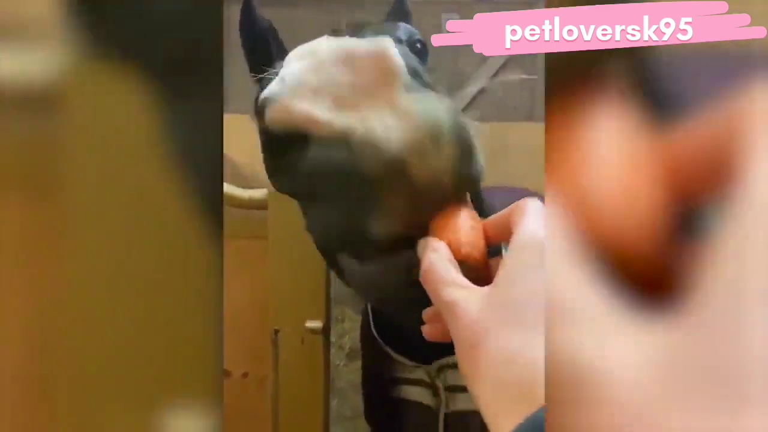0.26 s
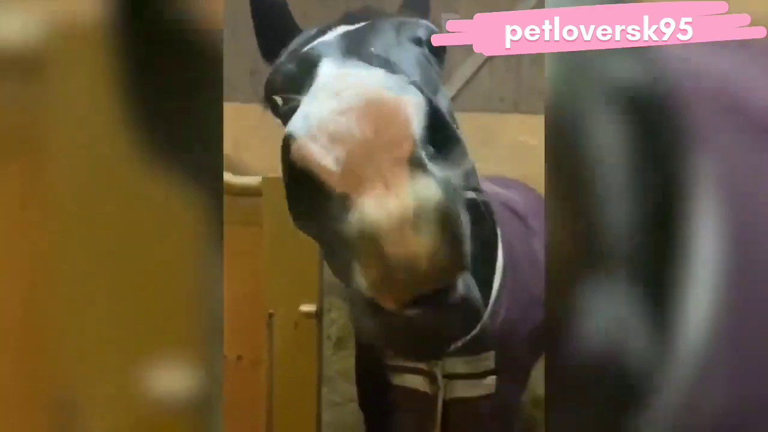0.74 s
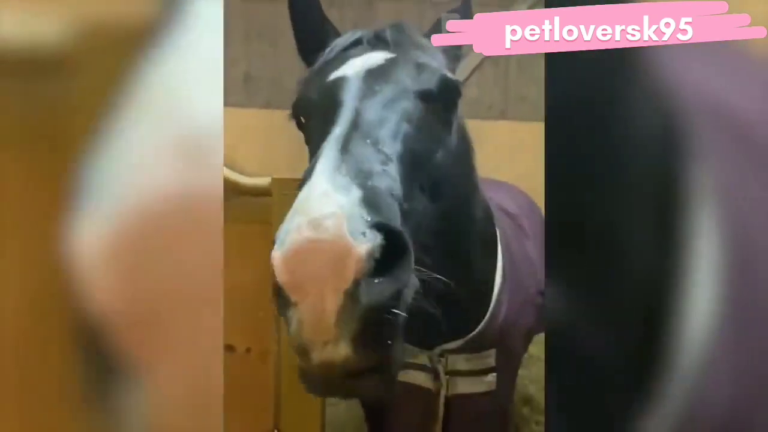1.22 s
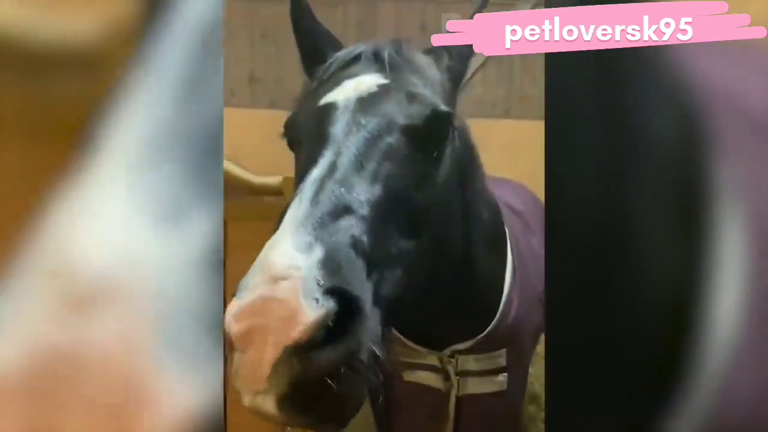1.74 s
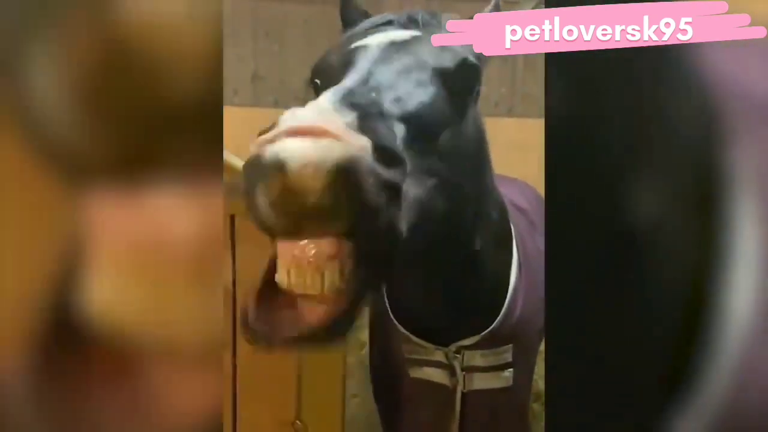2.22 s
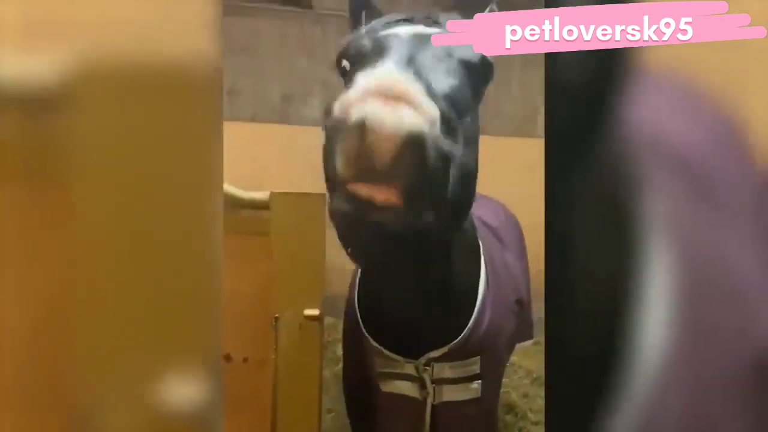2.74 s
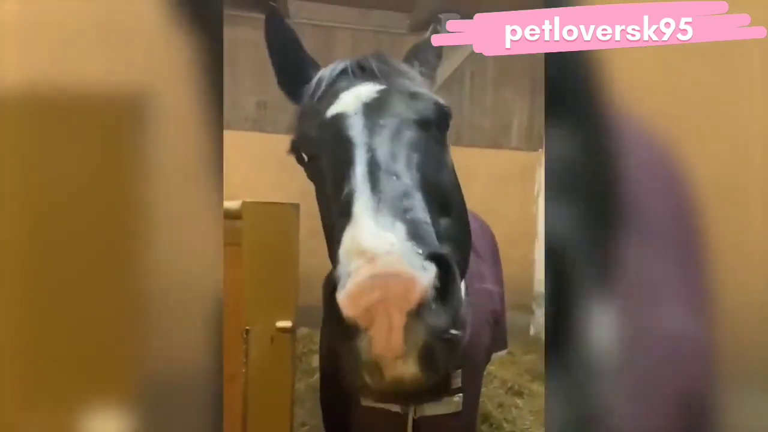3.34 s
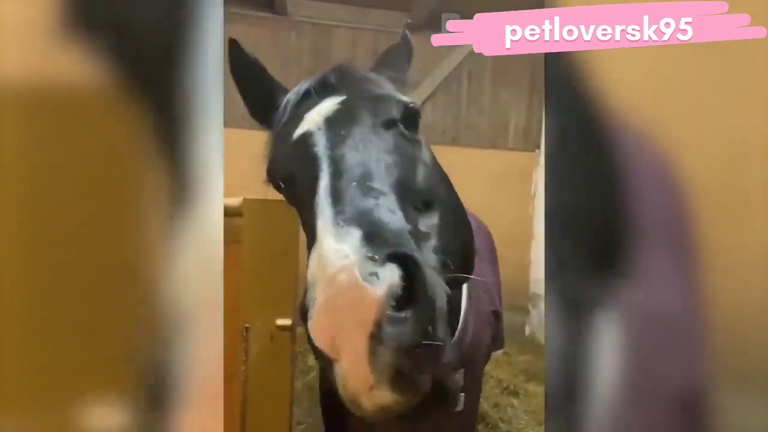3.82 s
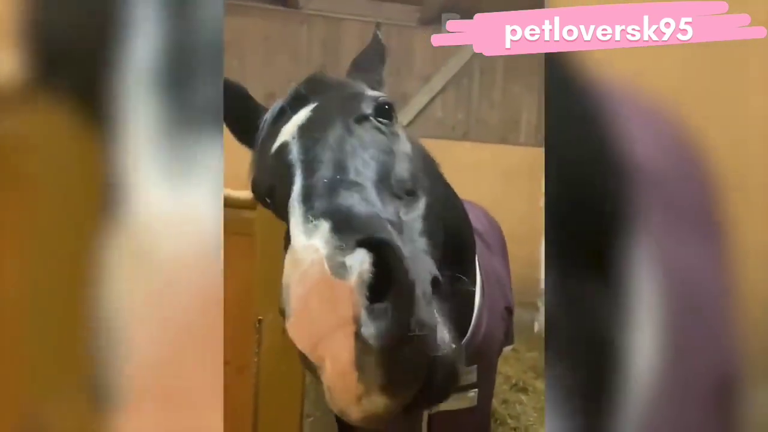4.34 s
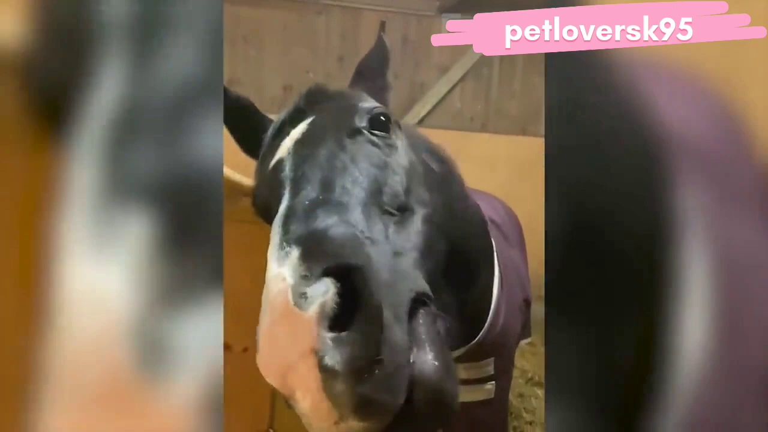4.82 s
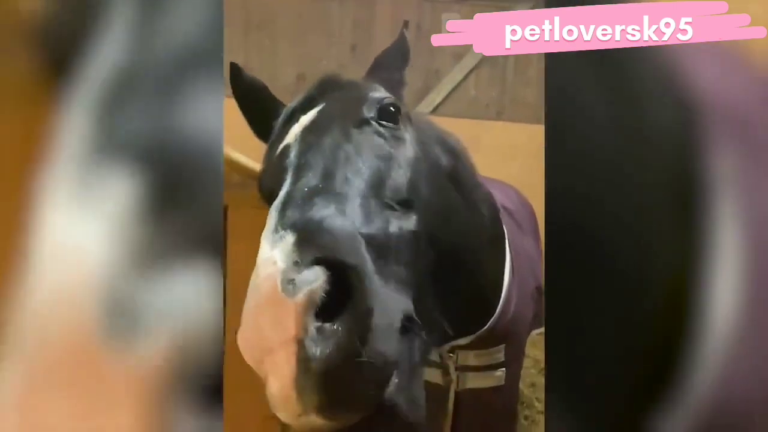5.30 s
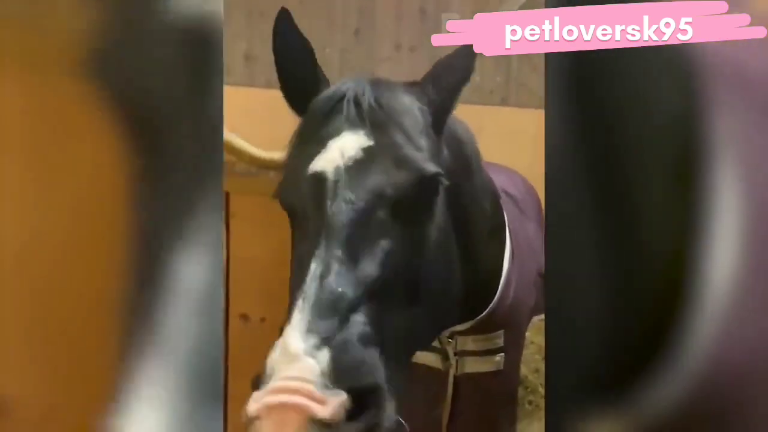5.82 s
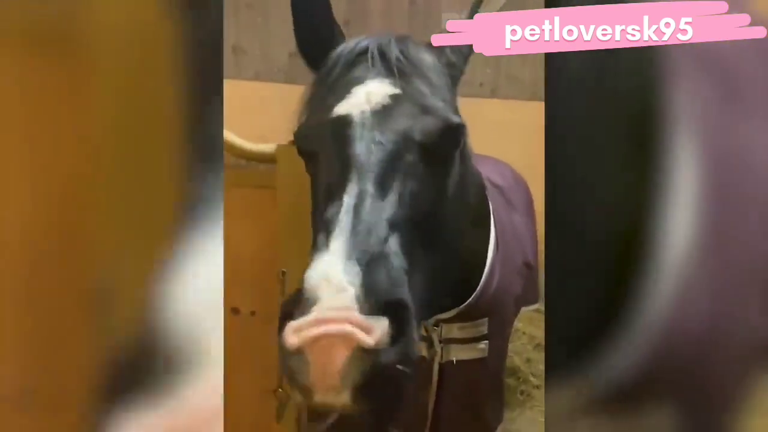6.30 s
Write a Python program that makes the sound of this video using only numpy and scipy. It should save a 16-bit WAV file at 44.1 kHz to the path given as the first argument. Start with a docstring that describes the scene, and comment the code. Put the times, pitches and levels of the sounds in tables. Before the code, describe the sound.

A horse eats a carrot very close to a phone in a wooden stall with a short diffuse echo and faint low rumble. At 0 s lips rub the carrot over a low grinding, with dull tooth knocks and small wet cracks; a crisper click comes at 0.5 s and another at 1.0 s. Light mouthing continues until 1.74-1.82 s, when the carrot breaks in a loud, hollow, splintering crunch. Wet lip smacks follow at about 2.2, 2.4, 2.6 and 2.8 s, the last three the loudest: sharp, popping, spitty. After a brief lull, chewing resumes from 3.0 s: moist crackle, fibre snaps and squelches, with heavier bites near 3.87, 4.2 and 4.46 s. Juicy crunches continue irregularly through 5.0, 5.35 and 5.6-5.8 s. A softer smack at 6.03 s leads to two wet smacks with hollow jaw knocks at 6.22 and 6.43 s.

```python
"""A horse bites through a carrot close to a phone in a wooden stall, smacks its lips and chews.
Breaks and tooth contacts ring the head's hollows as decaying sines; wet films snap in small cavities
that slide in pitch; jaw strokes grind the pulp as resonated random grains; crackle and fizz burst
around the lip smacks. The stall adds a short diffuse echo and a faint noise background."""
import sys
import numpy as np
from scipy import signal
from scipy.fft import rfft, irfft, next_fast_len
from scipy.io import wavfile
from scipy.ndimage import uniform_filter1d

SR = 44100
rng = np.random.default_rng(int(sys.argv[2]) if len(sys.argv) > 2 else 0)


def to_wav(sig):
    """Store sig (one row per channel, or 1-D mono) as 16-bit WAV at the path in sys.argv[1].

    Samples outside -1..1 are clipped; the rate is SR.
    """
    pcm = np.clip(np.atleast_2d(sig), -1, 1) * 32767
    pcm = np.round(pcm).astype(np.int16)
    wavfile.write(sys.argv[1], SR, pcm.T)  # frames by channels


N = 289709
TIME = np.arange(N) / SR
CONTROL_TIME = TIME[::32]
TOP_HZ = 16000

# Levels and gains in tables are relative: filters and layer gains follow.
# stall background: [f/Hz, relative density/dB per Hz]
STALL = [(20, -23), (40, -0.5), (62, 8.5), (110, -2), (260, -1), (500, -34), (1000, -27), (2500, -19.5),
         (6000, -42.5), (16000, -39)]
STALL_DB = -55.5
# lips dragging over the carrot's skin: [t/s, length/s, level/dB, f/Hz, section width/Hz]
RUBS = [(0.0, 0.12, -50.5, 2220, 1030), (0.0, 0.085, -52, 480, 298), (0.774, 0.3, -59, 1120, 437),
        (0.879, 0.078, -55.5, 2120, 1200)]
# jaw strokes: [peak t/s, build-up/s, release/s, grinding level/dB, pulp crackle level/dB]
STROKES = [(0.01, 0.41, 0.22, -31.5, -56.5), (0.24, 0.31, 0.083, -52, -61), (0.64, 0.02, 0.12, -74, -60),
           (0.778, 0.12, 0.48, -45.5, -61), (1.04, 0.24, 0.25, -54, -54.5), (1.25, 0.24, 0.24, -55.5, -61),
           (1.45, 0.061, 0.27, -60, -57), (1.55, 0.058, 0.069, -62, -49), (1.65, 0.12, 0.03, -42.5, -48.5),
           (1.77, 0.1, 0.26, -29.5, -39.5), (2.09, 0.056, 0.092, -42, -50.5),
           (3.051, 0.18, 0.24, -54, -51.5), (3.279, 0.13, 0.18, -44, -51.5), (3.4, 0.2, 0.26, -46, -51.5),
           (3.645, 0.11, 0.13, -44.5, -46), (3.87, 0.33, 0.4, -40.5, -45.5), (4.05, 0.034, 0.095, -46, -47),
           (4.21, 0.18, 0.22, -45.5, -46.5), (4.39, 0.17, 0.29, -45.5, -46.5),
           (4.457, 0.081, 0.11, -32.5, -41), (4.774, 0.086, 0.053, -45.5, -36.5),
           (4.87, 0.07, 0.27, -51, -55), (5.018, 0.17, 0.27, -38.5, -41), (5.189, 0.079, 0.17, -45, -61),
           (5.367, 0.085, 0.13, -38.5, -40), (5.575, 0.18, 0.11, -42, -48.5), (5.647, 0.22, 0.13, -37, -41),
           (5.819, 0.1, 0.021, -49, -59), (6.04, 0.023, 0.35, -45.5, -55), (6.25, 0.096, 0.11, -47, -76),
           (6.449, 0.099, 0.21, -40, -53)]
STROKE_RANGE_DB = 31.5  # climb over one build-up, fall over one release
REST_GRIND_DB, REST_CRACKLE_DB = -65, -85.5  # the tongue works on between strokes
JUICE_FIZZ_DB = -13.5  # pressed-out juice, re crackle
# bursts of crackle and fizz around the lip smacks: [t/s, crackle level/dB, fizz level/dB]
WET_BURSTS = [(2.186, -49, -43.5), (2.196, -49, -37), (2.392, -26.5, -25.5), (2.579, -29, -30),
              (2.782, -31, -25), (6.018, -46.5, -40), (6.028, -42.5, -31), (6.222, -34.5, -34.5),
              (6.409, -44, -39.5)]
BURST_RISE_S, BURST_FALL_S = 0.033, 0.032  # per STROKE_RANGE_DB
BURST_RUB_DB = -5  # dull part of a burst, re crackle
TRICKLE_DB, TRICKLE_S = -22, 0.17  # saliva crackles on after a burst
# faint fizz of saliva in the mouth: [t/s, level/dB]
SALIVA = [(0.0, -74.5), (0.36, -63.5), (0.55, -60), (0.71, -61.5), (0.78, -55.5), (1.11, -59), (1.2, -58),
          (1.37, -62), (1.76, -54), (1.9, -66), (2.12, -99), (2.38, -65.5), (2.67, -61), (3.4, -66.5),
          (4.06, -61), (4.48, -68), (4.92, -59.5), (5.58, -72.5), (5.85, -82.5), (6.57, -61.5)]
SALIVA_SWELL_DB, SALIVA_SWELLS_PER_S = 2.5, 9
# grinding heard through the cheeks: [f/Hz, section width/Hz, gain/dB]
CHEEKS = [(100, 440, -2.5), (181, 285, 4), (298, 100, -1), (452, 100, -11.5), (744, 145, 0.5)]
# resonances of the mouth around the pulp: [f/Hz, section width/Hz, gain/dB]
MOUTH = [(700, 250, 9.5), (1555, 540, 11.5), (2027, 68, 15), (2790, 890, 9), (4280, 490, 3), (5730, 140, 4)]
# colour of the saliva's fizz: [f/Hz, relative gain/dB]
FIZZ = [(2500, -1), (5000, 4), (6200, 2), (7500, -5), (9200, 1), (12300, -1.5), (13800, -21), (16000, -11)]
# stray films of saliva
TICKS_PER_S, TICK_DB, TICK_SPREAD_DB = 18, 8, 3
TICK_CEILING_DB = -52  # cap on the stroke level that drives them
# paths through the changing gap of the lips: [median delay/s, gain/1]
LIP_PATHS = [(.00055, -.55), (.0013, .45)]
LIP_MOVES_PER_S, LIP_TRAVEL = 9, .22  # travel: rms of log delay
# stall echo: [band centre f/Hz, t60/s, relative gain/dB]
ECHO = [(151, 0.74, -15), (347, 0.38, -11), (1154, 0.54, -11.5), (3380, 0.2, -10.5), (9130, 0.19, -11.5)]
# jaw knocks, the carrot breaking at the loudest:
# [t/s, level/dB, head f/Hz, head t60/s, relative mouth level/dB, mouth f/Hz]
KNOCKS = [(0.0375, -28, 225, 0.0029, -18, 750), (0.352, -41, 322, 0.012, -19, 870),
          (0.442, -30, 304, 0.08, -34, 810), (0.6292, -29.5, 246, 0.032, -56, 560),
          (0.646, -38.5, 216, 0.13, -58, 550), (0.662, -30, 201, 0.024, -41, 885),
          (0.769, -36.5, 116, 0.058, -22, 804), (0.805, -41, 108, 0.16, -25, 950),
          (0.883, -40.5, 108, 0.13, -11, 930), (1.001, -44.5, 364, 0.024, -7, 790),
          (1.188, -40, 240, 0.043, -32, 770), (1.229, -32, 205, 0.0062, -39, 863),
          (1.2516, -34.5, 202, 0.029, -44, 755), (1.4338, -38, 270, 0.041, -31, 720),
          (1.545, -46, 337, 0.19, 8.5, 826), (1.649, -40, 314, 0.12, 8, 836),
          (1.7371, -15.5, 320, 0.17, -3, 773), (1.7614, -13, 320, 0.12, -6, 765),
          (1.7802, -17, 320, 0.054, -7, 833), (1.8175, -15, 334.4, 0.11, -14.5, 708),
          (1.8463, -34.5, 330, 0.048, -24, 860), (1.884, -36, 312, 0.037, -30, 688),
          (2.0571, -32.5, 260, 0.053, -13.5, 668), (2.086, -36.5, 217, 0.14, -16, 770),
          (2.541, -46.5, 260, .03, -17, 740), (3.02, -39.5, 240, 0.035, -32, 740),
          (3.215, -44, 347, 0.056, -6.5, 710), (3.291, -33.5, 279, 0.056, -22, 720),
          (3.355, -38.5, 252, .04, -26, 730), (3.3935, -47, 267.6, 0.11, 12.5, 740),
          (3.621, -37.5, 312, 0.047, -27, 795), (3.666, -39, 326, 0.025, -11, 780),
          (3.703, -54.5, 296, .04, 5, 785), (3.81, -35, 306, 0.2, -33, 586),
          (3.853, -25.5, 274, 0.13, -15, 777), (3.879, -21, 234, 0.032, -13.5, 595),
          (4.0495, -42, 245, 0.15, -8, 850), (4.094, -41, 210, .035, -26, 750),
          (4.183, -36, 275, 0.054, -43, 670), (4.2012, -30, 283, 0.011, -41, 650),
          (4.236, -32, 302, 0.0096, -16, 820), (4.381, -37.5, 329, 0.1, 0, 810),
          (4.425, -41, 400, 0.017, -2, 800), (4.4585, -16, 247, 0.031, -15, 794),
          (4.485, -35, 126, 0.052, -33, 800), (4.644, -40.5, 220, .035, -19, 746),
          (4.68, -51, 310, 0.034, -1.5, 800), (4.751, -36.5, 353, 0.13, 1, 876),
          (4.777, -27.5, 370, 0.14, 2, 749), (4.856, -31.5, 343, 0.11, -15, 656),
          (4.92, -43, 336, 0.079, -10, 760), (4.9898, -28, 234, 0.17, -14, 587),
          (5.0154, -29.5, 265, 0.18, -23, 665), (5.0367, -32.5, 240, 0.11, -12, 733),
          (5.18, -32, 263, 0.071, -2, 794), (5.285, -52.5, 304, .03, 2.5, 855),
          (5.342, -35, 233, 0.069, -27, 890), (5.351, -41, 326, 0.034, -1, 800),
          (5.3606, -25, 281, 0.044, -15, 720), (5.5537, -37, 306, 0.15, -13, 645),
          (5.6247, -34.5, 285, 0.12, -7, 965), (5.6567, -34, 253, 0.033, -3, 905),
          (5.7292, -40, 456, 0.014, -10, 884), (5.797, -51, 330, 0.023, 1.5, 697),
          (6.029, -34.5, 332, 0.016, -17, 865), (6.04, -26.5, 252, 0.017, -12.5, 614),
          (6.2264, -18, 308, 0.027, -20, 677), (6.4282, -15, 345, 0.038, -13, 688),
          (6.4856, -36, 405, 0.044, -19, 564)]
# carrot fibres and saliva cracking between the teeth:
# [t/s, level/dB, cavity f/Hz, ring t60/s, relative spray level/dB]
CRACKS = [(0.2202, -33, 2320, 0.01, -24), (0.2599, -36, 2200, 0.0078, -15), (0.3872, -50, 1540, 0.0043, 3),
          (0.5153, -26, 4240, 0.0089, -13.5), (0.6157, -46.5, 3080, 0.0066, 6),
          (0.75, -32, 2960, 0.0051, -10.5), (1.0036, -20.5, 1810, 0.006, -18),
          (1.053, -32, 2710, 0.0074, -16), (1.068, -34, 2480, 0.013, -16),
          (1.1293, -31.5, 3040, 0.0099, -19), (1.6479, -33.5, 4460, 0.034, -3.5),
          (1.7371, -13.5, 3170, 0.0038, -17.5), (1.7618, -18.5, 1474, 0.021, -8),
          (1.7825, -18.5, 1500, 0.016, -20), (1.8202, -25.5, 2960, 0.006, -6),
          (2.057, -27, 1620, 0.0059, -36), (2.0935, -35, 2400, 0.015, -32),
          (2.1155, -37, 2420, 0.0066, -30), (2.8963, -44, 2280, 0.0072, -17),
          (3.042, -30.5, 1470, 0.012, -35), (3.17, -42.5, 3040, 0.021, -28),
          (3.214, -37, 2980, 0.0075, -13), (3.2546, -29, 2720, 0.012, -16), (3.279, -44.5, 3130, .01, 1),
          (3.36, -39, 2510, .009, -34), (3.3815, -39, 3070, 0.022, -35), (3.3924, -26.5, 2750, 0.019, -39),
          (3.417, -35, 2600, 0.013, -35), (3.4395, -44, 2650, 0.014, -25), (3.472, -38, 2750, 0.022, -14),
          (3.619, -27.5, 2680, 0.015, -19), (3.6468, -21.5, 1670, 0.024, -20),
          (3.6613, -30, 1500, 0.041, -33), (3.667, -44, 2900, .008, -12), (3.7046, -36, 2900, 0.033, -32),
          (3.8657, -29, 1550, 0.027, -9), (3.876, -36, 2820, 0.014, 4), (4.052, -24.5, 2510, 0.023, -10),
          (4.112, -36.5, 3040, 0.051, -6), (4.1826, -11.5, 2880, 0.0035, -26.5),
          (4.1998, -24, 1620, 0.018, -16.5), (4.2327, -33, 3580, 0.037, -11),
          (4.356, -41, 1230, 0.022, -4.5), (4.4523, -16, 1595, 0.014, -23.5),
          (4.582, -28, 2650, 0.004, -32), (4.614, -39.5, 3530, 0.0097, -5.5),
          (4.6854, -35, 2540, 0.0021, -8), (4.7618, -27, 3200, 0.0072, -24),
          (4.7797, -30, 3440, 0.0011, -25), (4.987, -28, 2420, 0.015, -34), (5.0027, -29, 3080, 0.023, -20),
          (5.0301, -23.5, 3330, 0.015, -14), (5.0314, -22, 2080, 0.0089, -21),
          (5.0575, -33.5, 1990, .009, -17), (5.1806, -25, 2780, 0.018, -9.5),
          (5.288, -34, 3620, 0.019, -11.5), (5.348, -29.5, 1320, 0.047, -13),
          (5.3612, -25.5, 3230, 0.006, -24), (5.5105, -40, 2090, .008, -28),
          (5.5753, -26, 2800, 0.0052, -35), (5.5845, -33, 2680, 0.0074, -27),
          (5.6205, -23, 2340, 0.006, -34), (5.646, -19, 2680, 0.0097, -33),
          (5.649, -18.5, 2900, 0.0045, -20), (5.7976, -43, 2320, 0.021, -11),
          (5.8141, -32, 2530, 0.011, -31), (5.8183, -16, 2700, 0.01, -34), (5.821, -37, 2300, .008, -18),
          (5.824, -51, 3130, 0.022, -19)]
CRACK_SWELL_S, CRACK_DROP_OCTAVES = .0009, .15
# lips and tongue snapping open:
# [t/s, level/dB, cavity f/Hz, ring t60/s, relative spray level/dB, swell/s, pitch drop/octaves]
SMACKS = [(2.1933, -29.5, 2860, .004, 15, 0.0017, -0.35), (2.1953, -17.5, 5930, .006, -21, 0.0018, -0.066),
          (2.2053, -19, 1670, .012, -23, 0.00059, 0.62), (2.2095, -17.5, 1620, .016, -23, 0.0011, 0.13),
          (2.227, -30, 2060, .009, -4, 0.00094, 0), (2.3374, -33.5, 2110, .008, -5, 0.00028, 0.28),
          (2.3614, -34.5, 3550, .0046, -2.5, 0.00075, -0.12),
          (2.3664, -31.5, 1440, .008, -8, 0.00088, 0.33), (2.3817, -6.5, 1305, .012, -5.5, .0014, 2),
          (2.394, -3.5, 2880, .005, -15.5, 0.00069, -0.31), (2.3948, -13.5, 4060, .008, -9, 0.0025, 0.71),
          (2.5648, -11, 2000, .005, -14.5, 0.00061, 0.3), (2.5804, -3, 1237, .011, -14, 0.0013, 1.4),
          (2.5902, -3, 2980, .012, -5, 0.00093, 0.065), (2.596, -17.5, 2410, .008, -30, 0.0014, -0.54),
          (2.6212, -24.5, 2060, .006, -15, 0.00062, 0), (2.6276, -28, 2100, .016, -28.5, 0.0009, 0.18),
          (2.7626, -25.5, 1480, .0094, -4.5, 0.0012, -0.73), (2.768, -30, 2190, .007, -15, 0.0009, -0.016),
          (2.783, -11, 1240, .011, -8, 0.0014, 1.23), (2.7936, 1, 2460, .013, -5.5, 0.00051, -0.15),
          (6.028, -14, 1380, .008, -2, 0.0018, 0.1), (6.2198, -26.5, 1620, .0026, 7, 0.00056, 1.6),
          (6.2246, -19, 3040, .0088, -15, 0.001, -0.069), (6.3984, -31, 3420, .0087, -3, 0.0011, -0.24),
          (6.407, -25, 2880, .0056, -21, 0.00064, 0.1), (6.4228, -17.5, 1450, .016, 1.5, 0.00077, -0.19),
          (6.4288, -15.5, 1490, .0092, -5, 0.0013, 0.34)]
# partials of a snapping cavity: [nominal frequency ratio/1, level/dB]
CAVITY = [(1.001, -1.5), (1.52, -50), (2.38, -31), (3.7, -37.5)]
# colour of the spray from a snap: [f/Hz, relative gain/dB]
SPRAY = [(200, -5), (700, -34), (1400, 11.5), (3000, 9), (4400, 1.5), (5800, 6.5), (7200, -3.5),
         (9000, 3.5), (12000, 1), (16000, -4.5)]
OPENING_S = 0.00078  # time constant of a cavity's pitch settling
SMACK_HISS_DB, HISS_GROWTH_S = -6, .0025  # hiss before a snap: level re spray, growth time constant
# closed lips muffle the cracks behind them: [f/Hz, gain/dB]
LIPS = [(3000, -0.5), (5000, -2), (9000, -0.5), (12500, -17.5), (16000, -21)]
# hollows of the mouth struck by a crack: [f/Hz, section width/Hz, gain/dB]
HOLLOWS = [(742, 900, 5.5), (1620, 700, 6), (2590, 580, 16), (3240, 400, 10), (4810, 180, 2)]
# bundles of wet fibres giving way: [t/s, length/s, level/dB, centre f/Hz]
CRUNCHES = [(0.501, 0.019, -43, 1020), (0.5157, 0.0049, -38, 6360), (0.5166, 0.013, -35.5, 1760),
            (0.52, 0.0092, -37, 3330), (1.064, 0.024, -50, 2850), (1.185, 0.0054, -47.5, 2300),
            (1.217, 0.024, -55, 2240), (1.634, 0.025, -50, 3000), (1.747, .004, -29, 3170),
            (1.757, 0.0055, -33, 3340), (1.764, 0.0041, -29, 5370), (1.7795, .005, -26.5, 2360),
            (1.812, .006, -30, 1930), (1.825, 0.0045, -31, 2160), (1.845, 0.033, -44.5, 1530),
            (2.61, 0.051, -47, 2710), (2.793, 0.0068, -31, 3520), (2.797, 0.041, -40, 2170),
            (3.02, 0.017, -47, 2190), (3.072, 0.026, -51, 2240), (3.22, 0.034, -48, 2530),
            (3.26, 0.029, -50, 4200), (3.359, 0.032, -47.5, 2430), (3.424, 0.0079, -51, 2500),
            (3.613, 0.0091, -37.5, 2600), (3.64, 0.019, -51, 1830), (3.827, 0.0088, -45, 2980),
            (3.848, 0.01, -38, 2630), (3.922, 0.023, -46.5, 3030), (3.957, 0.0056, -43.5, 1690),
            (3.987, 0.0044, -43.5, 2870), (4.208, 0.025, -41.5, 2880), (4.367, 0.013, -56, 2470),
            (4.42, 0.016, -46, 2330), (4.456, 0.011, -34, 2400), (4.75, 0.0055, -34, 2300),
            (4.7505, .004, -42, 5300), (4.775, 0.013, -29, 3300), (4.971, 0.02, -41.5, 2340),
            (5.004, 0.025, -41, 2470), (5.025, 0.0074, -37, 1710), (5.061, 0.021, -50, 2380),
            (5.088, 0.034, -46, 2320), (5.344, 0.039, -42, 2330), (5.347, .016, -41, 1150),
            (5.57, 0.026, -43, 2780), (5.618, .006, -31.5, 2130), (5.632, 0.01, -34.5, 2080),
            (5.644, .014, -30.5, 1610), (5.676, 0.01, -51, 2430), (6.007, .012, -40, 2350),
            (6.027, .006, -31.5, 1920), (6.4222, 0.0063, -35, 2380)]
# scatter of a fracture's pitch, its ring (cycles to -60 dB), scatter of its size
CRUNCH_OCTAVES, CRUNCH_CYCLES, CRUNCH_SPREAD_DB = .45, 12, 5
# the mouth colours a crunch on its way out: [f/Hz, gain/dB]
CRUNCH_COLOUR = [(750, -3.5), (1100, -6), (1550, -3), (2000, -5.5), (2900, -0.5), (4100, -2.5),
                 (5000, -0.5), (7000, -8), (10000, 7)]
# wet squelches in a cheek pocket that changes size: [t/s, length/s, level/dB, first f/Hz, last f/Hz]
SQUELCHES = [(0.905, 0.04, -53.5, 982, 940), (1.127, 0.01, -51.5, 1440, 1280),
             (1.308, 0.017, -50.5, 597, 745), (1.445, 0.045, -49, 397, 427), (2.538, 0.0076, -47, 639, 754),
             (3.019, 0.14, -50, 404.4, 352), (3.216, 0.074, -48, 335, 413),
             (3.22, 0.025, -49.5, 1640, 1580), (3.244, 0.096, -53, 431, 306), (3.405, 0.048, -50, 808, 840),
             (3.924, 0.0081, -35.5, 630, 740), (3.943, 0.037, -40, 577, 705), (4.014, 0.02, -41, 649, 870),
             (4.335, 0.044, -49.5, 406, 338), (4.353, 0.073, -47.5, 856, 767),
             (4.859, 0.067, -54, 392, 328), (5.074, 0.083, -42.5, 503, 558), (5.193, 0.035, -43, 617, 550),
             (5.387, 0.044, -52, 500, 567), (6.257, 0.056, -46, 366, 397), (6.461, 0.04, -39, 370, 442)]
# lip spray fanning out between the ports: [f/Hz, side re smack/dB]
FAN = [(3000, -28), (5000, -22), (9000, -5), (13000, -8.5)]
FAN_LAG_S = .0002
SMACK_ECHO_DB = -7.5  # the lips face the phone, so less of a smack reaches the walls
# stereo lean to the right: [f/Hz, side re mid/dB]
LEAN = [(60, -46), (200, -40.5), (380, -47.5), (520, -27), (650, -8), (900, -3.5), (1100, 2), (1350, -16.5),
        (1600, -7), (2100, -14.5), (2650, -31), (3400, -22), (4500, -33.5), (6500, -55)]
# scatter from the phone's body, differing between the ports: [f/Hz, side re mid/dB]
SCATTER = [(60, -38), (200, -22), (330, -9), (520, -1), (800, 2.5), (1200, 5), (1900, -4), (2600, -25.5),
           (3500, -3.5), (9000, -15.5), (12500, -49)]


def undb(db):
    """Decibels to gain."""
    return 10 ** (np.asarray(db) / 20)


def unit(x):
    """Scale to rms 1."""
    return x / np.sqrt(np.mean(x ** 2))


def band(x, hz, width):
    """Two-pole resonance with gain 1 at its centre."""
    g = np.tan(np.pi * min(hz, SR * .45) / SR)
    k = width / hz
    numerator = [g * k, 0, -g * k]
    denominator = [1 + g * k + g * g, 2 * g * g - 2, 1 - g * k + g * g]
    return signal.lfilter(numerator, denominator, x)


def resonate(x, modes):
    """Parallel resonances (f/Hz, section width/Hz, gain/dB), each two equal sections in series."""
    return sum(undb(db) * band(band(x, hz, width), hz, width) for hz, width, db in modes)


def shape(x, points):
    """Filter by a gain curve (f/Hz, gain/dB), interpolated over log frequency."""
    hz, db = np.transpose(points)
    size = next_fast_len(len(x))
    f = np.maximum(np.fft.rfftfreq(size, 1 / SR), 1)
    gain = undb(np.interp(np.log(f), np.log(hz), db))
    return irfft(rfft(x, size) * gain, size)[:len(x)]


def colour(x, points):
    """Filter by a gain curve, then scale to rms 1."""
    return unit(shape(x, points))


def fade(t, rise, t60):
    """Envelope that swells to 1 in rise seconds, then decays 60 dB per t60."""
    swell = np.sin(np.pi / 2 * np.minimum(t / rise, 1)) ** 2
    return swell * np.exp(-np.log(1000) * np.maximum(t - rise, 0) / t60)


def add(track, s, sound):
    """Mix a sound into the track at time s."""
    i = int(np.clip(s * SR, 0, N - 1))
    track[i:i + len(sound)] += sound[:N - i]


def walk(rate):
    """Smooth chance of rms 1, changing about rate times a second."""
    size = max(int(SR / rate), 2)
    noise = rng.standard_normal(N)
    return unit(uniform_filter1d(uniform_filter1d(noise, size), size))


def patchy(x, rate, depth_db):
    """Let a sound come and go in uneven clusters, mean gain power held over 0.1 s."""
    gain = undb(depth_db * np.clip(walk(rate), -2, 1.5))
    return x * gain / np.sqrt(uniform_filter1d(gain ** 2, SR // 10))


def grains(rate, spread_db):
    """Random tiny fractures of uneven size, power evened out over 1/20 s."""
    size = undb(spread_db * np.minimum(rng.exponential(size=N), 4))
    x = (rng.random(N) < rate / SR) * size * rng.choice([-1, 1], N)
    return x / np.sqrt(uniform_filter1d(x * x, SR // 20) + 1e-9)


def through_lips(x):
    """Wet noise leaves by paths of wandering length, so its spectral peaks and valleys shift."""
    out = x
    for delay_s, gain in LIP_PATHS:
        lag = delay_s * np.exp(LIP_TRAVEL * walk(LIP_MOVES_PER_S))
        out = out + gain * np.interp(TIME - lag, TIME, x)
    return out * np.std(x) / np.std(out)


def background():
    """Faint low rumble of the building: coloured noise, wavering a little."""
    mid, side = (colour(rng.standard_normal(N), STALL) for _ in range(2))
    waver_db = 0.74 * walk(rate=5.2)
    stereo = undb(-1.5) * band(np.array([side, -side]), 2400, 4600)
    return undb(STALL_DB + waver_db) * (mid + stereo)


def rubs(rise_s):
    """A lip sticks and slips on the carrot; the gap of the mouth colours the friction."""
    out, slips = np.zeros(N), grains(rate=2700, spread_db=1.5)
    for s, length, db, hz, width in RUBS:
        t = np.arange(int(length * SR)) / SR
        local_slips = np.roll(slips, -int(s * SR))[:len(t)]
        friction = unit(resonate(local_slips, [(hz, width, 0)]))
        envelope = np.minimum(t / rise_s, 1) * np.cos(np.pi / 2 * t / length)
        add(out, s, undb(db) * friction * envelope)
    return out


def press(s, build_s, release_s):
    """Level in dB, climbing linearly to 0 at time s and falling away."""
    return -STROKE_RANGE_DB * np.maximum((s - CONTROL_TIME) / build_s, (CONTROL_TIME - s) / release_s)


def together(levels_db):
    """Power sum of levels in dB."""
    return 10 * np.log10(sum(np.exp(np.maximum(db, -120) * np.log(10) / 10) for db in levels_db))


def mouth_levels():
    """Grinding, crackle and fizz in dB over time, from jaw strokes and the wet bursts around smacks."""
    grind, crackle = [REST_GRIND_DB], [REST_CRACKLE_DB]
    for s, build_s, release_s, grind_db, crackle_db in STROKES:
        pressure = press(s, build_s, release_s)
        grind.append(grind_db + pressure)
        crackle.append(crackle_db + pressure)
    crackle = [together(crackle)]
    fizz = [crackle[0] + JUICE_FIZZ_DB, np.interp(CONTROL_TIME, *np.transpose(SALIVA))]
    for s, crackle_db, fizz_db in WET_BURSTS:
        trickle = TRICKLE_DB + press(s, BURST_RISE_S, TRICKLE_S)
        burst = np.maximum(press(s, BURST_RISE_S, BURST_FALL_S), trickle)
        grind.append(crackle_db + BURST_RUB_DB + burst)
        crackle.append(crackle_db + burst)
        fizz.append(fizz_db + burst)
    return [np.interp(TIME, CONTROL_TIME, together(layer)) for layer in (grind, crackle, fizz)]


def stray_ticks(crackle_db, rise, t60, ring_db, ring_t60):
    """Small films snap at random: a crackle burst plus the ring of one mouth pocket."""
    out, t = np.zeros(N), np.arange(SR // 25) / SR
    bursts = unit(resonate(rng.standard_normal(N), MOUTH))
    count = int(TICKS_PER_S * N / SR)
    for when, size, pocket, detune in rng.random((count, 4)):
        i = int(when * (N - len(t)))
        hz = MOUTH[int(pocket * len(MOUTH))][0] * 2 ** (0.11 * (detune - .5))
        burst = bursts[i:i + len(t)] * fade(t, rise, t60)
        ring = np.sin(2 * np.pi * hz * t) * fade(t, rise, ring_t60)
        level_db = min(crackle_db[i], TICK_CEILING_DB) + TICK_DB + TICK_SPREAD_DB * (2 * size - 1)
        add(out, i / SR, undb(level_db) * (burst + undb(ring_db) * ring))
    return out


def bubbles(level_db, hz, octaves, cycles, spread_db, count):
    """Saliva bubbles pop at random, each a short sine of rising pitch, following the level curve."""
    out, t = np.zeros(N), np.arange(SR // 25) / SR
    scatter = np.clip(rng.standard_normal((count, 2)), -2, 2)
    for when, (pitch, size) in zip(rng.random(count), scatter):
        f = hz * 2 ** (octaves * pitch)
        ring = np.sin(2 * np.pi * f * t * (1 + 4 * t)) * fade(t, 1 / f, cycles / f)
        add(out, when * N / SR, undb(level_db[int(when * N)] + spread_db * size) * ring)
    return out


def chewing():
    """Molars crush pulp: grinding through the cheeks; crackle, ticks, bubbles and fizz from the mouth."""
    grind_db, crackle_db, fizz_db = mouth_levels()
    grind = unit(resonate(grains(rate=1500, spread_db=1.0), CHEEKS)) * undb(grind_db)
    # each resonance of the crackle flickers at random on its own
    fractures = grains(rate=900, spread_db=3.5)
    pockets = sum(patchy(resonate(fractures, [mode]), rate=90, depth_db=5) for mode in MOUTH)
    crackle = unit(pockets) * undb(crackle_db)
    ticks = stray_ticks(crackle_db, rise=0.00057, t60=0.0097, ring_db=-7, ring_t60=0.022)
    # capped, so random pops stay small
    bubble_db = np.minimum(crackle_db, -47)
    pops = bubbles(bubble_db + 3, hz=2450, octaves=.33, cycles=35, spread_db=3, count=900)
    froth = bubbles(bubble_db - 2, hz=4300, octaves=0.24, cycles=70, spread_db=2, count=300)
    gurgle = bubbles(bubble_db - 19.0, hz=686, octaves=0.11, cycles=12, spread_db=3.0, count=450)
    droplets = grains(rate=3000, spread_db=3)
    swell_db = SALIVA_SWELL_DB * walk(SALIVA_SWELLS_PER_S)
    fizz = colour(droplets, FIZZ) * undb(fizz_db + swell_db)
    wet = patchy(through_lips(crackle + fizz) + pops + froth, rate=80, depth_db=3)
    return grind + gurgle + ticks + wet


def stall_echo(x):
    """Wooden walls return a short diffuse tail, most alike on both sides in the bass."""
    t = np.arange(SR // 2) / SR
    response = 0
    for hz, t60, db in ECHO:
        noise = rng.standard_normal((2, len(t)))
        mid, side = band(band(noise, hz, 1.18 * hz), hz, 1.18 * hz)
        tail = fade(t, 0.00086, t60)
        tail = tail / np.sqrt(np.sum(tail ** 2))
        width = min(hz / 600, .6)
        response = response + undb(db) * tail * (mid + width * np.array([side, -side]))
    return signal.fftconvolve(x[None], response, axes=1)[:, :N]


def knocks(rise, mouth_t60, thump_db, thump_hz):
    """A tooth contact rings the mouth first; the heavier head swells later, over a dull thump."""
    out, t = np.zeros(N), np.arange(SR // 5) / SR
    # a small random pitch wobble roughens each head ring
    wobble = 1 + .04 * walk(rate=110)
    for s, db, hz, t60, mouth_db, mouth_hz in KNOCKS:
        local_wobble = np.roll(wobble, -int(s * SR))[:len(t)]
        head = np.sin(2 * np.pi * np.cumsum(hz * local_wobble) / SR) * fade(t, rise, t60)
        mouth = np.sin(2 * np.pi * mouth_hz * t) * fade(t, 0.0023, mouth_t60)
        detuned_hz = thump_hz * (1 + 0.03 * rng.standard_normal())
        thump = np.sin(2 * np.pi * detuned_hz * t) * fade(t, 0.0066, 0.047)
        add(out, s, undb(db) * (head + undb(mouth_db + 2.0) * mouth + undb(thump_db) * thump))
    return out


def snaps(table, spray_db, spray_t60, wet_db, wet_t60, hiss_db, hiss_growth_s):
    """A film bursts: its opening cavity rings and slides in pitch; droplets spray and trickle."""
    out, t = np.zeros(N), np.arange(SR // 8) / SR
    droplets = patchy(rng.standard_normal(N), rate=700, depth_db=3)
    mist = through_lips(colour(droplets, SPRAY))
    is_overtone = np.arange(len(CAVITY)) > 0
    for s, db, hz, t60, bright_db, rise, drop in table:
        sliding_hz = hz * 2 ** (drop * np.exp(-t / OPENING_S))
        phase = 2 * np.pi * np.cumsum(sliding_hz) / SR
        detune = 1 + 0.14 * rng.standard_normal(len(CAVITY)) * is_overtone
        ring = sum(undb(part_db) * np.sin(ratio * d * phase) for (ratio, part_db), d in zip(CAVITY, detune))
        spray = np.roll(mist, -int(s * SR)) * undb(bright_db + spray_db)
        wet = fade(t, rise, spray_t60) + undb(wet_db) * fade(t, 0.0041, wet_t60)
        add(out, s, undb(db) * (ring * fade(t, rise, t60) + spray[:len(t)] * wet))
        # a short hiss swells up just before the snap, ending halfway through its rise
        hiss = spray[-len(t):] * np.exp((t - t[-1]) / hiss_growth_s)
        add(out, s + rise / 2 - t[-1], undb(db + hiss_db) * hiss)
    return out


def mouth_rings(db, t60):
    """Each crack also strikes the whole mouth: a short burst of noise through its resonances."""
    out, t = np.zeros(N), np.arange(SR // 25) / SR
    hollow = unit(resonate(rng.standard_normal(N), HOLLOWS))
    for s, crack_db, *_ in CRACKS:
        ring = np.roll(hollow, -int(s * SR))[:len(t)] * fade(t, 0.00023, t60)
        add(out, s, undb(crack_db + db) * ring)
    return out


def crunches(attack_s, trend_db, count):
    """Fibres snap in turn, each ringing a pocket of its own size; trend_db tilts size over the rush."""
    out, t = np.zeros(N), np.arange(SR // 100) / SR
    for s, length, db, hz in CRUNCHES:
        rush = np.zeros(int(length * SR) + len(t))
        places = (np.arange(count) + rng.random(count)) / count
        scatter = np.clip(rng.standard_normal((count, 2)), -2, 2)
        for u, (pitch, size) in zip(places, scatter):
            f = min(hz * 2 ** (CRUNCH_OCTAVES * pitch), TOP_HZ)
            ring = np.sin(2 * np.pi * f * t) * fade(t, attack_s, CRUNCH_CYCLES / f)
            gain = rng.choice([-1, 1]) * undb(CRUNCH_SPREAD_DB * size + trend_db * u)
            add(rush, u * length, gain * ring)
        add(out, s, undb(db) * rush / np.sqrt(np.sum(rush ** 2) / (length * SR)))
    return shape(out, CRUNCH_COLOUR)


def squelches(flutter_hz, rough):
    """Juice squeezed through a pocket keeps it ringing unevenly while its pitch slides."""
    out = np.zeros(N)
    drive = 1 + rough * (walk(flutter_hz) + 1j * walk(flutter_hz))
    for s, length, db, first_hz, last_hz in SQUELCHES:
        u = np.linspace(0, 1, int(length * SR))
        phase = 2 * np.pi * np.cumsum(first_hz + (last_hz - first_hz) * u) / SR
        local_drive = np.roll(drive, -int(s * SR))[:len(u)]
        ring = np.imag(local_drive * np.exp(1j * phase))
        add(out, s, undb(db) * unit(ring) * np.sin(np.pi * u))
    return out


def puffs(db, hz, t60):
    """Each smack pushes out a little air: a dull bump in proportion to the smack."""
    out, t = np.zeros(N), np.arange(SR // 8) / SR
    for s, smack_db, *_ in SMACKS:
        pitch_hz = hz * 2 ** (0.084 * rng.standard_normal())
        add(out, s, undb(smack_db + db) * np.sin(2 * np.pi * pitch_hz * t) * fade(t, 0.011, t60))
    return out


def scene():
    """All the mouth's sounds, direct and from the walls, over the background."""
    pulp = rubs(rise_s=0.0055) + chewing() + mouth_rings(db=-17.0, t60=0.033)
    pulp = pulp + crunches(attack_s=0.00018, trend_db=3.5, count=18)
    jaw = knocks(rise=0.004, mouth_t60=0.044, thump_db=-12.5, thump_hz=174.8)
    crack_rows = [(*row, CRACK_SWELL_S, CRACK_DROP_OCTAVES) for row in CRACKS]
    cracks = snaps(crack_rows, spray_db=-4.0, spray_t60=0.015, wet_db=-3.0, wet_t60=0.087,
                   hiss_db=6.5, hiss_growth_s=HISS_GROWTH_S)
    juice = squelches(flutter_hz=220, rough=2.5)
    smacks = snaps(SMACKS, spray_db=-1.0, spray_t60=0.005, wet_db=-19, wet_t60=0.064,
                   hiss_db=SMACK_HISS_DB, hiss_growth_s=HISS_GROWTH_S)
    air = puffs(db=-35.5, hz=82.6, t60=0.046)
    mouth = undb(.5) * shape(cracks, LIPS) + undb(4.0) * jaw + pulp + juice + air
    lips = undb(-2.5) * smacks
    fan = shape(np.roll(lips, int(FAN_LAG_S * SR)), FAN)
    echo = stall_echo(mouth + undb(SMACK_ECHO_DB) * lips)
    return mouth + lips + np.array([-fan, fan]) + echo + background()


def record(dry):
    """The phone's two ports hear the mouth differently; loud peaks round off, both band ends are cut."""
    mid = dry.mean(axis=0)
    # random phase wander makes the scattered sound differ between the ports
    turn_rad = 1.7 * walk(rate=70)
    analytic = signal.hilbert(mid, next_fast_len(N))[:N]
    scattered = np.real(analytic * np.exp(1j * turn_rad))
    side = shape(mid, LEAN) + shape(scattered, SCATTER)
    low_cut = signal.butter(2, 34, "high", fs=SR, output="sos")
    ports = signal.sosfilt(low_cut, dry + np.array([-side, side]))
    rounded = ports / (1 + (ports / .92) ** 4) ** .25
    high_cut = signal.ellip(10, .2, 80, TOP_HZ, fs=SR, output="sos")
    return signal.sosfilt(high_cut, rounded)


dry = scene()
out = record(dry)
to_wav(out)
```